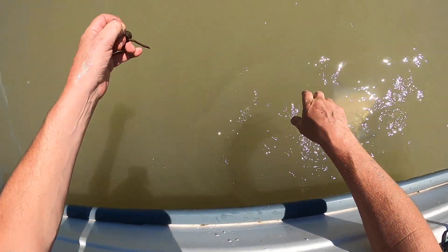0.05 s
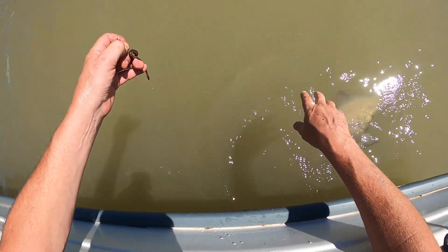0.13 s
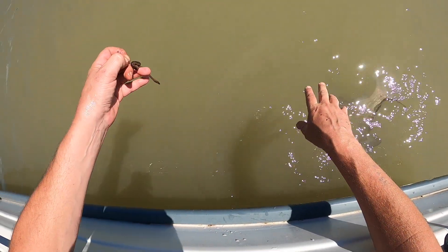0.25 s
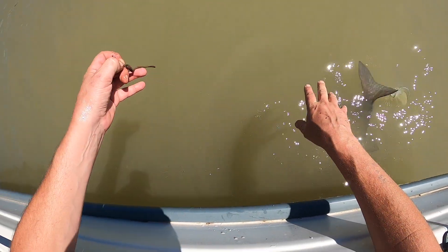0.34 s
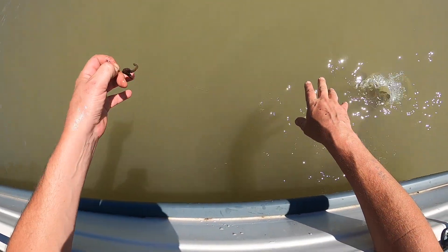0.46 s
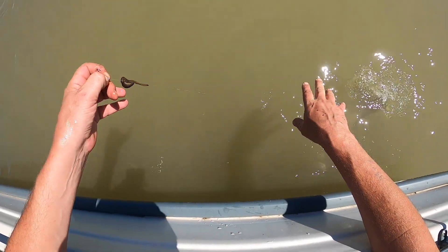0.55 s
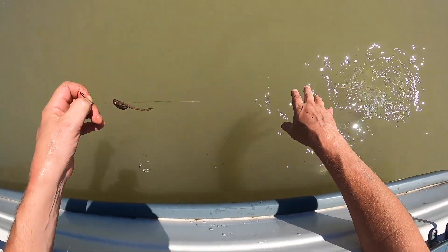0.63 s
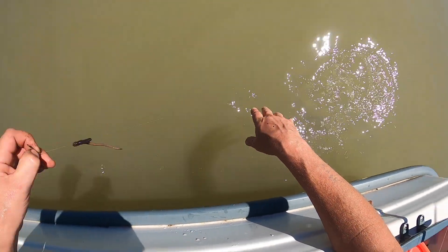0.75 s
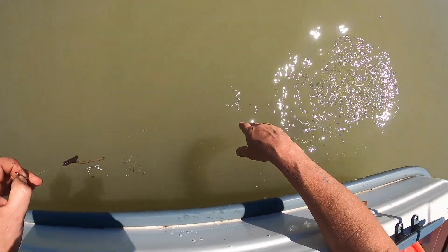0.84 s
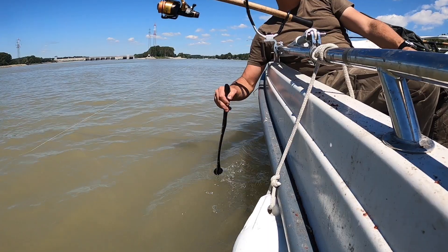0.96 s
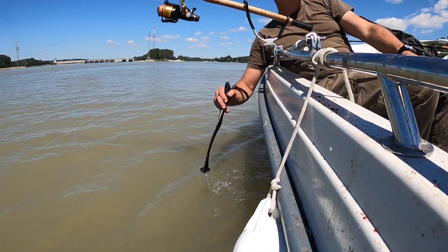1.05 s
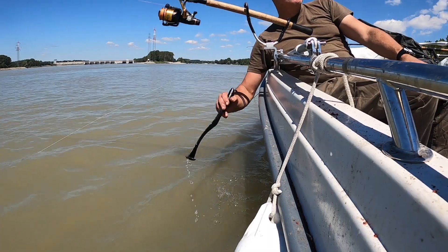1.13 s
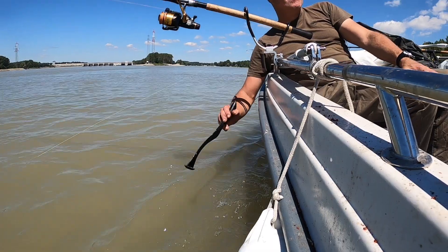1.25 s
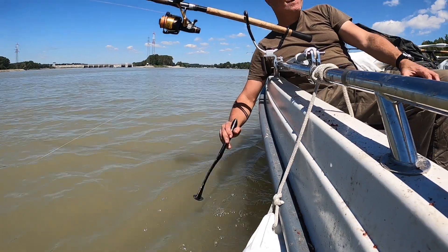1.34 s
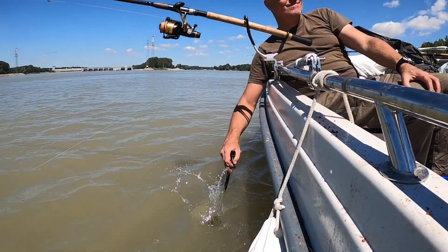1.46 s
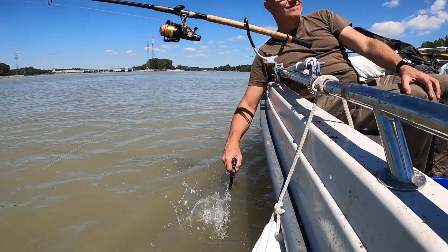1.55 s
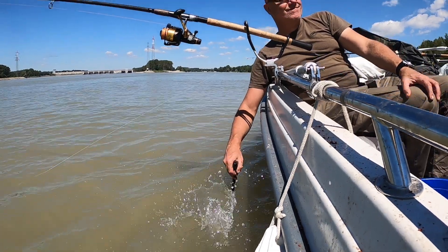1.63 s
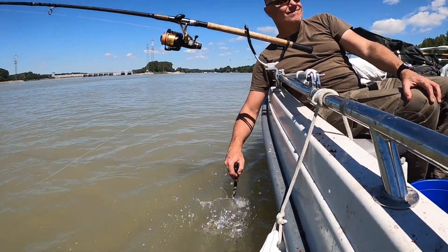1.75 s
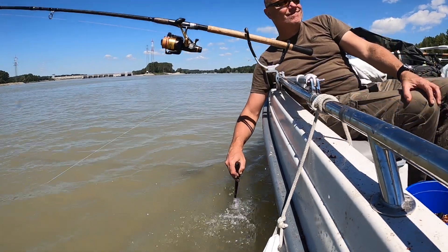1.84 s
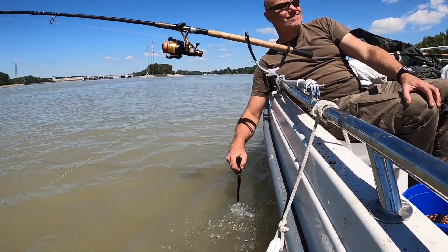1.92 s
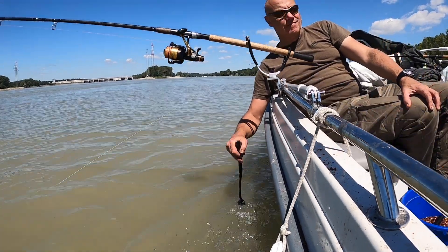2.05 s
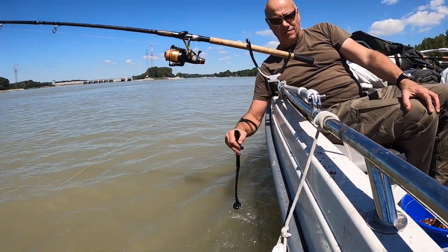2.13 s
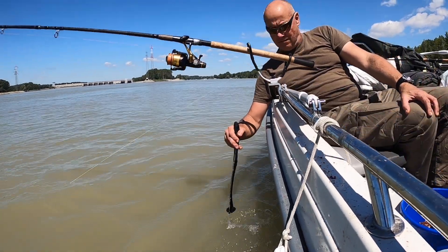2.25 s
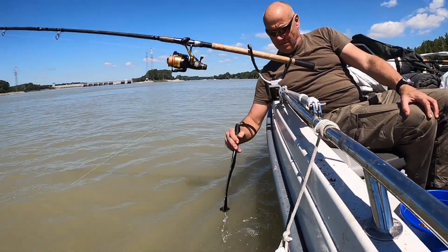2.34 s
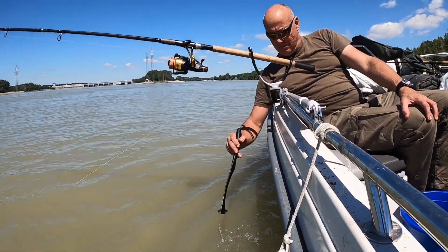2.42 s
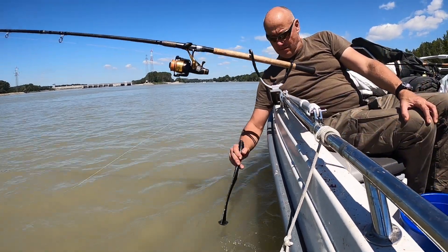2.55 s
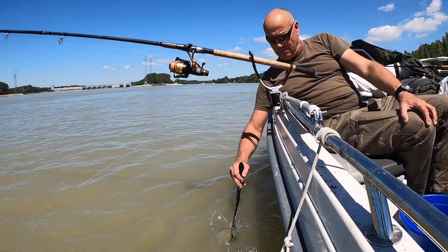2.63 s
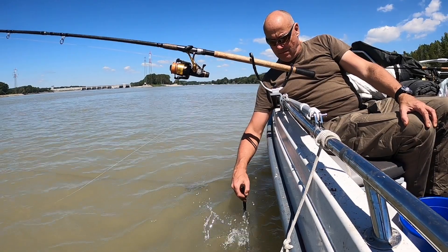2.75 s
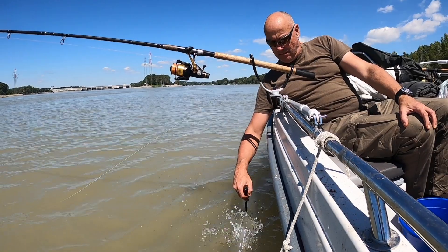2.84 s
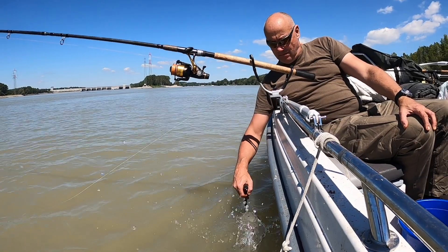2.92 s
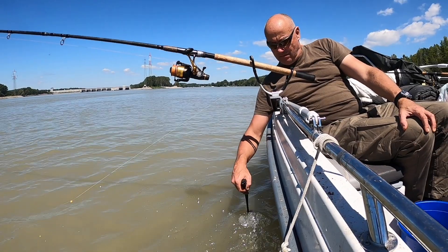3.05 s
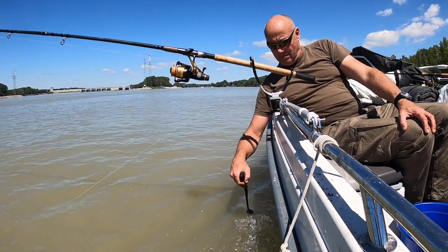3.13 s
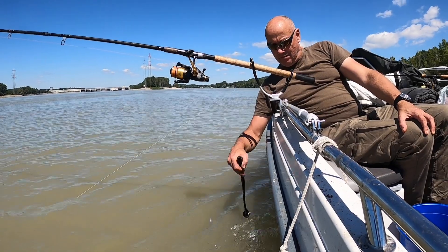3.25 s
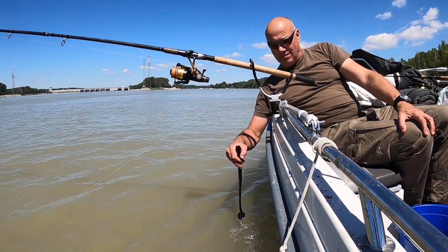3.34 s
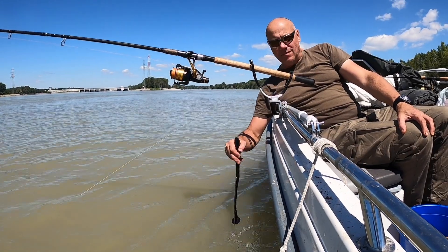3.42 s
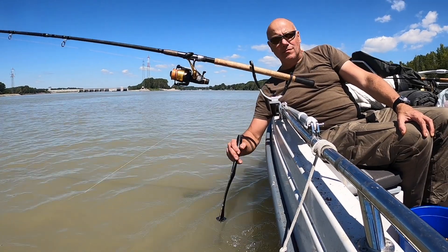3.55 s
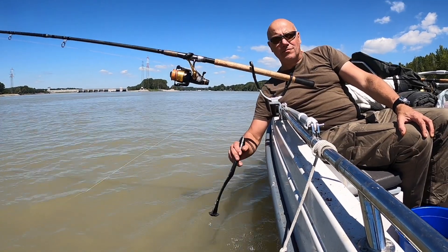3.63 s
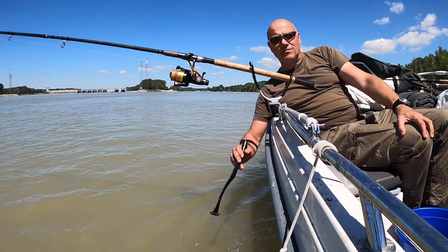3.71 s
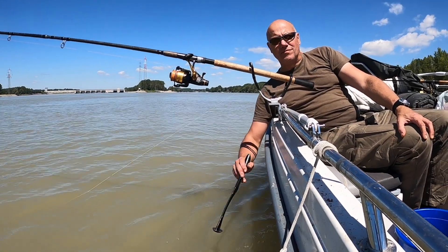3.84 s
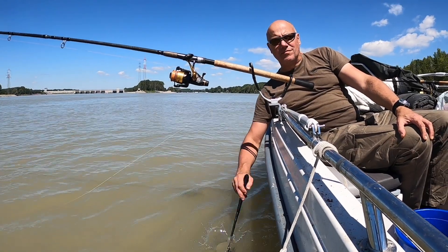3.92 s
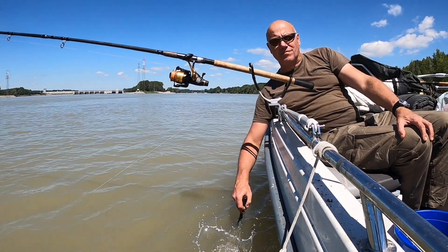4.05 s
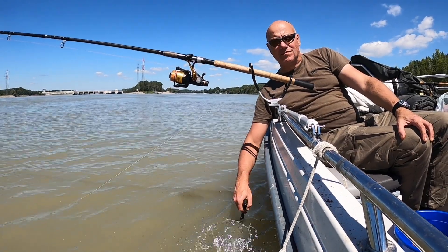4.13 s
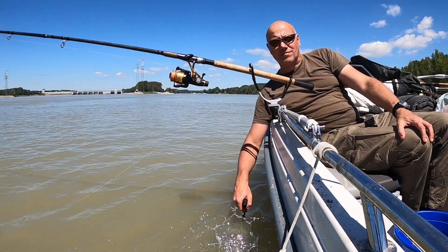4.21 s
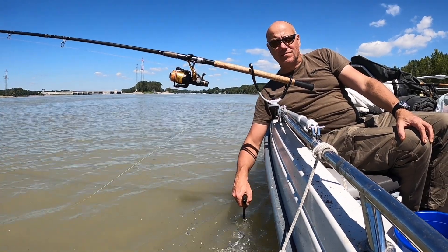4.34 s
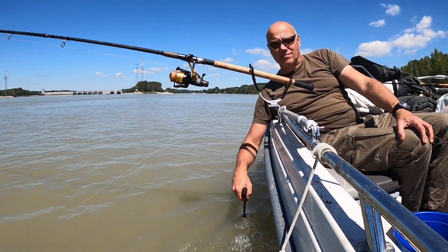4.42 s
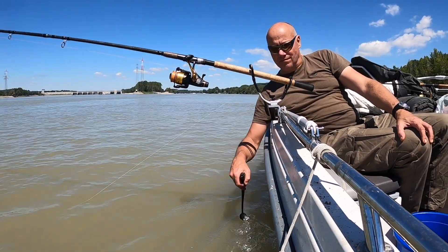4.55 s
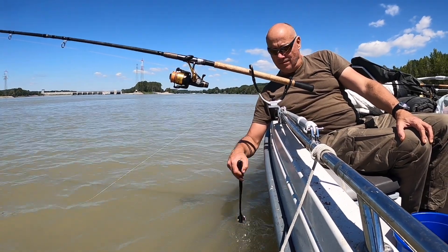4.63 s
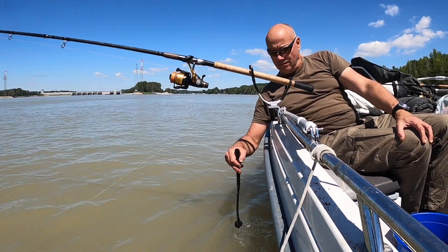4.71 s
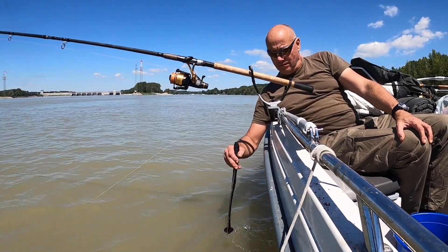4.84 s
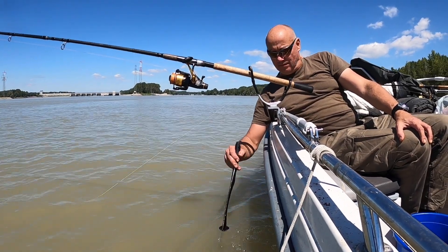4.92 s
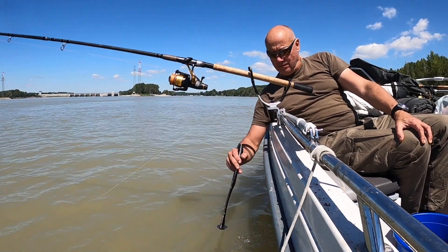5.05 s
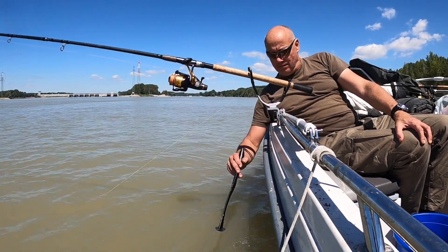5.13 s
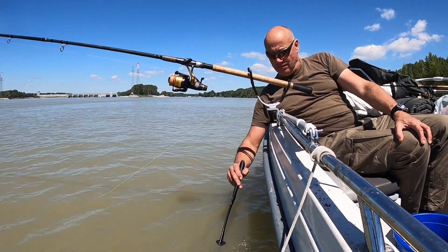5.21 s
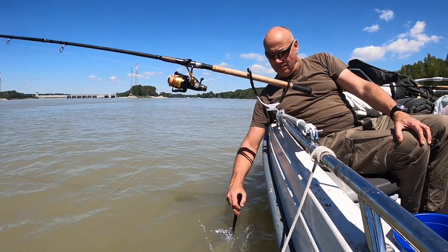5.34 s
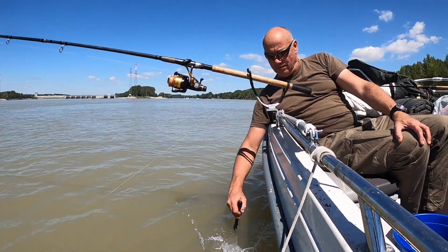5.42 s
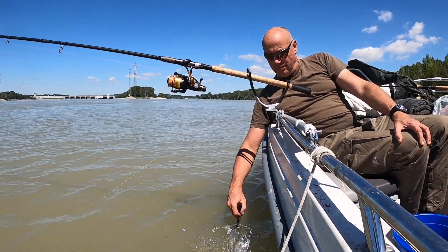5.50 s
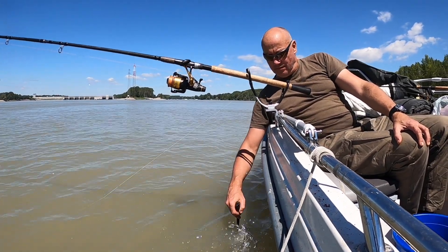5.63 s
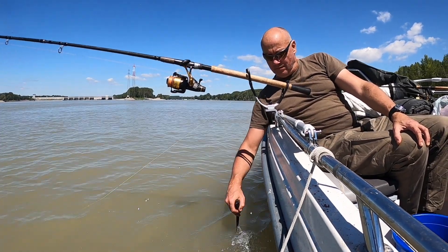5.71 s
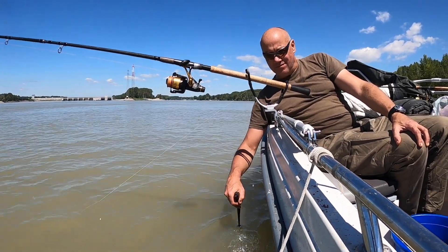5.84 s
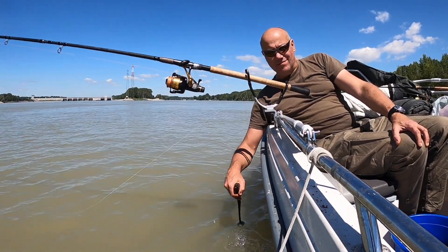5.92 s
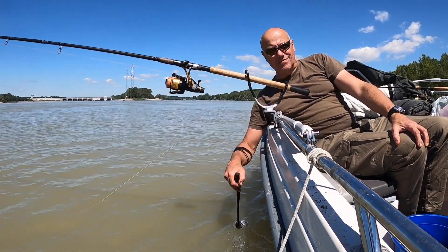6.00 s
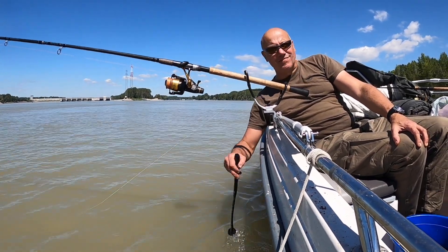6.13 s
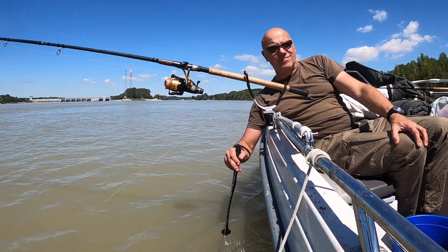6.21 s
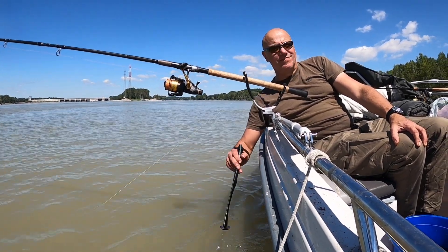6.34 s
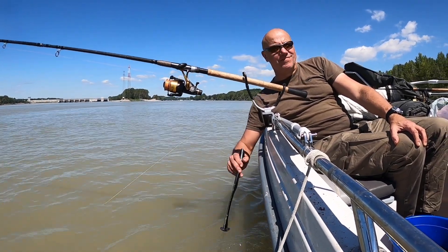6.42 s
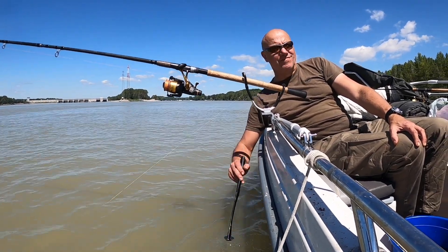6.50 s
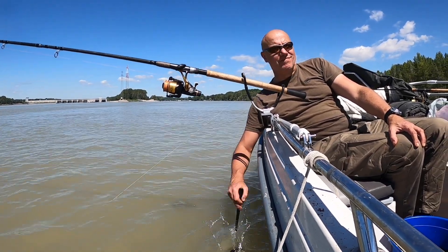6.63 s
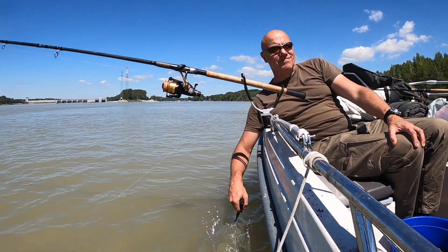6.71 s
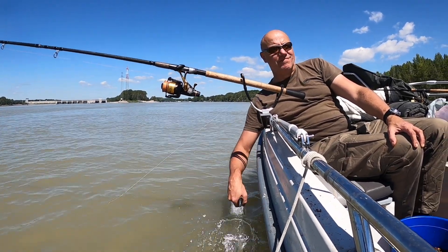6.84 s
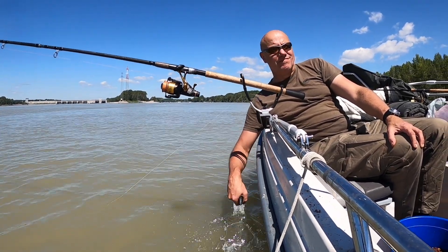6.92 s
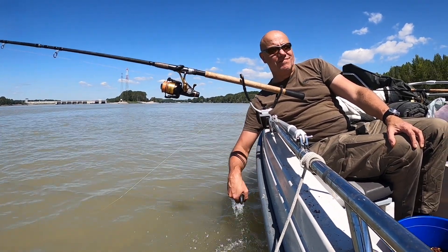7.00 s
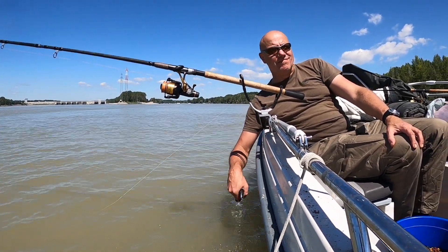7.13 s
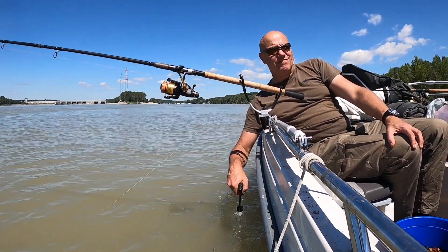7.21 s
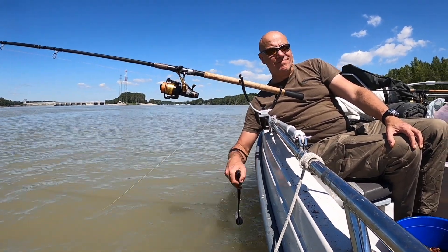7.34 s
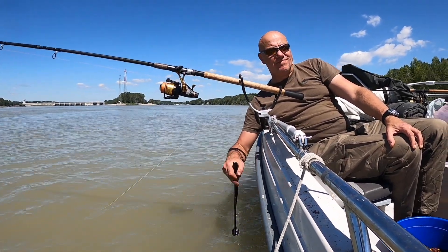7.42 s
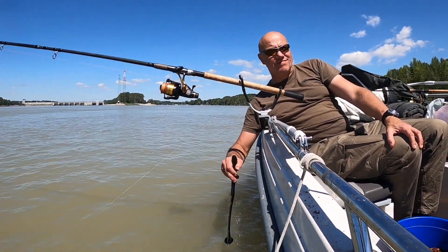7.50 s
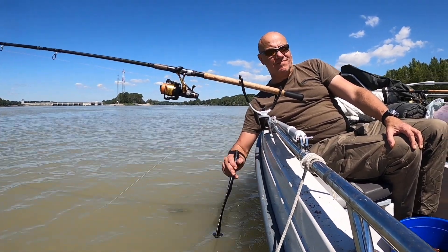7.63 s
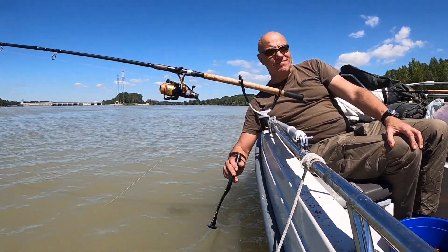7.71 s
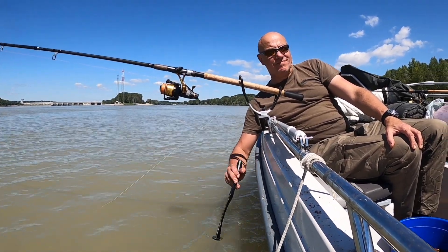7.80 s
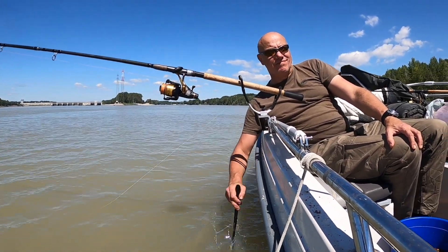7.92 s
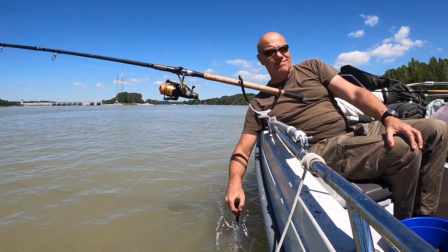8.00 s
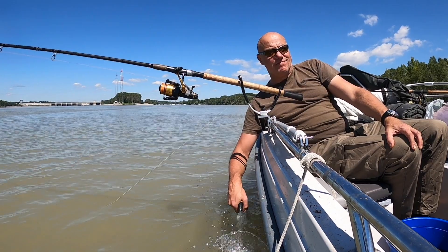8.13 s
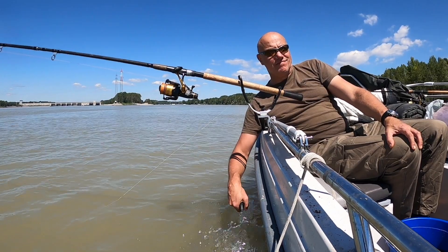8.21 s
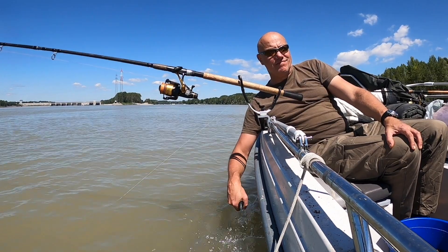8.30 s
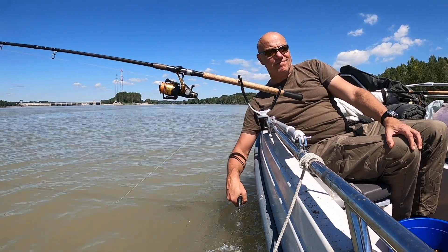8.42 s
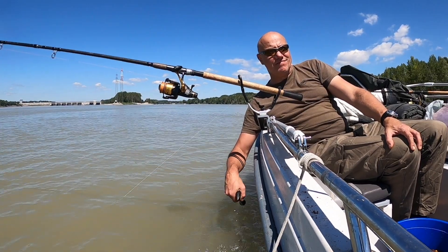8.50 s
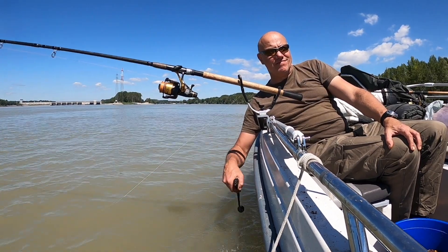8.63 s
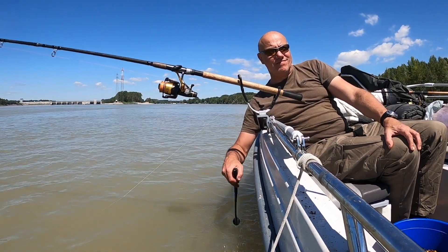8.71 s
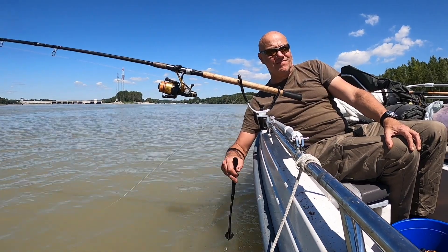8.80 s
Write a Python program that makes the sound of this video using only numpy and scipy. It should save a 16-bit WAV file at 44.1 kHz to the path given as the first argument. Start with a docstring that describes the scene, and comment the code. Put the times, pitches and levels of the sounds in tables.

```python
"""A fish splashes beside a small boat under a faint tonal hiss; then a clonk is pulled through the river six times.
The cup drags down an air pocket whose note falls as it lengthens; it pinches off with a crack of ringing
bubbles, then booms as one big bubble that rises in pitch as it floats up. Bubble crowds gurgle and fizz,
drops and thumps ring singly, low noise washes at the hull, and gusts rumble at the microphone.
"""
import sys
import numpy as np
from scipy import signal
from scipy.fft import rfft, irfft, next_fast_len
from scipy.io import wavfile

SR = 44100
rng = np.random.default_rng(int(sys.argv[2]) if len(sys.argv) > 2 else 0)


def unload_audio(sound):
    """Save the sound as a 16-bit wav file, at the path given as the first command line argument."""
    columns = np.transpose(np.atleast_2d(sound))
    # keep every value between -1 and 1, then stretch to whole-number steps
    steps = np.round(np.clip(columns, -1, 1) * 32767)
    wavfile.write(sys.argv[1], SR, steps.astype(np.int16))


N = 390726
TIME = np.arange(N) / SR
CUTOFF_HZ = 16000
RIVER_FROM_S = 1.0
SIDES = np.array([[1], [-1]])  # left, right

# strokes: [pinch-off t/s, ringing crack level/dB, hissing crack level/dB, churn level/dB, churn t60/s]
STROKE_ROWS = [(1.5833, -5, -20.5, -23, 0.27), (2.821, -22.5, -17, -26, 0.24),
               (4.114, -13, -18.5, -23.5, 0.23), (5.4695, -11.5, -18.5, -23.5, 0.27),
               (6.797, -20, -15, -19, 0.21), (8.121, -4, -18.5, -18.5, 0.24)]
# open air pocket, row per stroke: [opening t/s, first f/Hz, last f/Hz, sinking time/s,
# gulp level/dB, swell level/dB, swell delay/s]
POCKET_ROWS = [(1.49, 847, 363.3, 0.021, -33, -13, 0.053), (2.729, 743, 350, 0.031, -39.5, -49, 0.036),
               (4.029, 727, 371, 0.024, -24, -30.5, 0.045), (5.383, 634, 353, 0.034, -42, -33, 0.03),
               (6.699, 688, 338, 0.022, -21.5, -34.5, 0.035), (8.016, 681, 291.4, 0.046, -21, -26, 0.092)]
# spectrum of air noise, ripples and click: [f/Hz, relative level/dB]
AIR_SPECTRUM = [(350, -22.5), (600, 6), (688, -17.5), (984, -2.5), (1100, -6), (1260, -4.5), (2340, -9),
                (4910, -15.5), (5560, -16), (14100, -32.5), (16000, -50)]


def amp(db):
    """Decibels to gain."""
    return 10 ** (np.asarray(db) / 20)


def unit(x):
    """Scales to rms 1."""
    return x / np.sqrt(np.mean(x ** 2) + 1e-20)


def fade(t, t60):
    """Exponential decay, 60 dB down at t60."""
    return np.exp(-np.log(1000) * t / max(t60, 1e-3))


def bell(t, rise_s, fall_s):
    """Gaussian swell that peaks at t = 0; 1/e at rise_s before and fall_s after."""
    return np.exp(-np.minimum((t / np.where(t < 0, rise_s, fall_s)) ** 2, 60))


def add(mix, s, sound):
    """Mixes a sound in at time s."""
    part = mix[max(round(s * SR), 0):][:len(sound)]
    part += sound[:len(part)]


def colour(x, tone):
    """Gives x a spectrum, interpolated over log frequency, at rms 1."""
    size = next_fast_len(len(x))
    hz, db = np.transpose(tone)
    log_hz = np.log(np.fft.rfftfreq(size, 1 / SR) + 1)
    gain = amp(np.interp(log_hz, np.log(hz + 1), db))
    return unit(irfft(rfft(x, size) * gain, size)[:len(x)])


def noise(tone, size=N):
    """Steady coloured noise, rms 1."""
    return colour(rng.standard_normal(size), tone)


def murmur(width_hz, size):
    """Slowly wandering complex amplitude, rms 1: it blurs a tone into a band."""
    low_pass = signal.butter(2, min(width_hz / 2, SR / 4), fs=SR, output="sos")
    z = signal.sosfilt(low_pass, rng.standard_normal((2, size + SR // 10)))
    return (unit(z[0]) + 1j * unit(z[1]))[-size:] / np.sqrt(2)


def lumps(depth_db, rate_hz):
    """Random unevenness of level, rms 1."""
    return unit(amp(depth_db * np.clip(unit(murmur(rate_hz, N).real), -2, 2)))


def swells(rows):
    """Gain of a series of smooth swells, given as (s, half length s, dB)."""
    return sum(amp(db) * bell(TIME - s, half_s, half_s) for s, half_s, db in rows)


def open_river():
    """Gain of the river's background: off, then steady."""
    return np.clip((TIME - RIVER_FROM_S) / .004 + 1, 0, 1)


def image_width():
    """Stereo width: centred at first, fully open from 4.6 s."""
    return np.interp(TIME, [3.9, 4.6], [0, 1])


def ring(hz, t60, rise=0, swell=0.9):
    """A bubble: a sine that swells within a cycle or two, dies away and drifts by a share rise per second."""
    t = np.arange(int(SR * np.clip(1.3 * t60, .004, .4))) / SR
    tone = np.sin(2 * np.pi * hz * (t + rise * t * t / 2))
    return (1 - np.exp(-t * hz * swell)) * fade(t, t60) * tone


def swarm(per_s, low_hz, high_hz, cycles, spread_db, rise, count=48):
    """Steady random crowd of bubbles of many sizes; small ones ring higher and die sooner."""
    out = np.zeros(N)
    pitches = np.geomspace(low_hz, min(high_hz, SR / 2), count)
    lives = rng.uniform(0.75, 1.57, count)
    shapes = [hz * ring(hz, cycles * k / hz, rise * k) for hz, k in zip(pitches, lives)]
    draws = np.random.default_rng(rng.integers(2 ** 31)).random((int(per_s * N / SR), 3))
    sizes = amp(spread_db * np.minimum(-np.log(1 - draws[:, 2]), 3.5))
    for (when, which, _), size in zip(draws, sizes):
        add(out, when * N / SR, size * shapes[int(which * count)])
    return out


def pockets(gulp_s=0.0075, swell_s=0.026, shut_s=0.0071, blur=.35, overtone=.17, blur_hz=200):
    """The open pocket sings lower as it lengthens; its ragged walls blur the note and stir its overtones."""
    out = np.zeros(N)
    for (pinch_s, *_), row in zip(STROKE_ROWS, POCKET_ROWS):
        s, first_hz, last_hz, sink_s, gulp_db, swell_db, delay_s = row
        t = np.arange(0, pinch_s - s, 1 / SR)
        hz = last_hz + (first_hz - last_hz) * np.exp(-t / sink_s)
        turn = np.exp(2j * np.pi * np.cumsum(hz) / SR)
        note = turn * (1 + blur * murmur(blur_hz, len(t)))
        note = note + sum(overtone * turn ** k * murmur(blur_hz, len(t)) for k in (2, 3))
        gulp = amp(gulp_db) * (t / gulp_s * np.exp(1 - t / gulp_s)) ** 2
        swell = amp(swell_db) * bell(t - delay_s, swell_s, swell_s) * np.minimum(t / gulp_s, 1)
        shutting = np.minimum((t[-1] - t) / shut_s, 1)
        add(out, s, note.imag * (gulp + swell) * shutting)
    return out


def booms(squeeze=1.0, relax_s=0.0048, overtone_db=-30, creep=0.242, burst_share=0.2,
          wobble_per_s=1.8, waver_hz=45):
    """The closed bubble starts squeezed and high, drops to its deep note, then climbs and swells near the surface."""
    # closed bubble, row per stroke: [deep f/Hz, surface f/Hz, float-up time/s, lateness of climb (power),
    # level/dB, t60/s, surfacing level/dB]
    boom_rows = [(130, 225, .11, 2.43, -7, 0.12, -41), (104.8, 384, .335, 3.4, -11.5, 0.28, -32),
                 (109, 590, .416, 3.3, -9.5, 0.29, -41), (116.5, 450, .305, 2.96, -7.5, 0.25, -39),
                 (86, 465, 0.133, 4.8, -10.5, 0.22, -15.5), (103.6, 520, .159, 2.84, -10, 0.26, -33)]
    out = np.zeros(N)
    for (pinch_s, *_), row in zip(STROKE_ROWS, boom_rows):
        deep_hz, top_hz, float_s, lateness, db, t60, surface_db = row
        t = np.arange(0, float_s, 1 / SR)
        risen = t / float_s
        climb = creep * risen + (1 - creep) * risen ** lateness
        hz = deep_hz * (top_hz / deep_hz) ** climb * (1 + squeeze * np.exp(-t / relax_s))
        phase = 2 * np.pi * np.cumsum(hz) / SR
        unsteady = abs(1 + wobble_per_s * float_s * murmur(waver_hz, len(t)))  # a slow climb wobbles more
        swing = amp(db) * fade(t, t60) + amp(surface_db) * risen ** 2 * unsteady
        bursting = np.minimum((1 - risen) / burst_share, 1)
        onset = 1 - np.exp(-t / .0025)
        tone = amp(overtone_db) * np.cos(2 * phase) - np.sin(phase)
        add(out, pinch_s + .0021, swing * bursting * onset * tone)
    return out


def cracks(ring_life=2.34, hiss_t60=0.058, swell_s=0.0018, neck_db=-15, neck_s=0.0036,
           thud_db=-6, thud_hz=265, thud_t60=0.052):
    """The pocket's neck hisses shut, then its walls slam together: thud, burst and cluster of ringing bubbles."""
    # small bubbles shed at pinch-off, list per stroke: [f/Hz, width/Hz, level/dB]
    shed_modes = [
        [(836, 200, 3.5), (1260, 100, -7), (1560, 190, 0.5), (2380, 440, 7.5), (4780, 150, -16),
         (6100, 170, -16)],
        [(1520, 230, 11), (2890, 94, 7.5), (3300, 90, 3), (4400, 120, 3), (5480, 160, 7), (6440, 100, -21)],
        [(975, 100, 3), (1485, 255, 14), (1990, 170, 5), (2670, 190, 4), (4470, 200, 2.5), (6470, 120, -21)],
        [(1044, 150, 4), (1640, 150, -1), (2450, 280, 7), (3070, 130, -14), (4460, 170, -4), (5820, 250, 0.5)],
        [(1035, 46, 0), (1446, 23, 0), (4280, 42, -12), (4250, 21, -9), (4540, 15, -24), (5100, 120, -8)],
        [(1030, 85, -18), (1620, 350, 13.5), (2470, 110, -16), (3190, 120, -8), (3630, 160, -6.5),
         (5150, 120, -16)],
    ]
    # hiss spectrum: [f/Hz, relative level/dB]
    hiss_tone = [(150, -67), (250, 7.5), (510, -17), (1010, -39), (1240, -6), (1700, -17), (1980, -15),
                 (2910, -10.5), (7310, -21.5), (7980, -18.5), (14900, -44.5), (16000, -57)]
    out, t = np.zeros(N), np.arange(4096) / SR
    swell = 1 - np.exp(-(t / swell_s) ** 2)
    for (s, crack_db, hiss_db, *_), modes in zip(STROKE_ROWS, shed_modes):
        cluster = sum(amp(db) * fade(t, ring_life / width_hz) * np.sin(2 * np.pi * (hz * t + rng.random()))
                      for hz, width_hz, db in modes)
        hiss = noise(hiss_tone, len(t))
        add(out, s - t[-1], amp(hiss_db + neck_db) * hiss * np.exp(-t[::-1] / neck_s))
        add(out, s, swell * (amp(crack_db) * cluster + amp(hiss_db) * hiss * fade(t, hiss_t60)))
        add(out, s + 0.0012, -amp(crack_db + thud_db) * ring(thud_hz, thud_t60))
    return out


def rushes(attack_s=0.0012, tear_s=0.014, narrow_s=0.084, lead_s=0.0073, fizz_t60=0.35):
    """Gains of gurgle and fizz along the shaft: a burst as the pocket opens, another as it narrows."""
    # water tearing along the shaft, row per stroke: [opening gurgle level/dB, narrowing gurgle level/dB, fizz level/dB]
    rush_rows = [(-29, -49, -48), (-60, -48.5, -53), (-31, -57, -51), (-35, -51, -46.5), (-45, -51, -47.5),
                 (-34, -32.5, -43)]
    gurgle, fizz = np.zeros(N), np.zeros(N)
    for (pinch_s, *_), (s, *_), (open_db, narrow_db, fizz_db) in zip(STROKE_ROWS, POCKET_ROWS, rush_rows):
        t = np.arange(0, pinch_s - s, 1 / SR)
        onset = 1 - np.exp(-t / attack_s)
        narrowing = bell(t - t[-1] + lead_s, narrow_s, narrow_s)
        add(gurgle, s, onset * (amp(open_db) * np.exp(-t / tear_s) + amp(narrow_db) * narrowing))
        add(fizz, s, onset * amp(fizz_db) * fade(t, fizz_t60))
    return gurgle, fizz


def showers(lump_db=4.0, lump_hz=70, trickle_db=-50, trickle_fizz_db=-62, trickle_delay_s=0.13, trickle_s=0.079):
    """Gains of gurgle and fizz where thrown water lands: each shower builds and thins, arriving in clumps."""
    # showers from fish and strokes: [thickest t/s, build-up/s, dying away/s, gurgle level/dB, fizz level/dB]
    spray_rows = [(.087, 0.01, 0.022, -40, -71), (0.428, 0.031, 0.075, -41, -62),
                  (.545, 0.034, 0.028, -43, -44), (.605, 0.018, 0.048, -44.5, -50.5),
                  (.76, 0.074, 0.027, -61, -61.5), (1.06, 0.045, 0.095, -60, -68),
                  (1.89, 0.066, .13, -45, -50), (3.12, 0.061, 0.17, -44, -56.5),
                  (4.47, 0.074, 0.075, -40, -53.5), (5.78, 0.078, 0.1, -49, -55.5),
                  (7.12, 0.23, 0.19, -41.5, -51.5), (8.458, 0.11, 0.085, -35.5, -46.5)]
    gains = sum(amp([[gurgle_db], [fizz_db]]) * bell(TIME - s, rise_s, fall_s)
                for s, rise_s, fall_s, gurgle_db, fizz_db in spray_rows)
    # the crater's rim drains back
    trickle = sum(bell(TIME - s - trickle_delay_s, trickle_s, trickle_s) for s, *_ in STROKE_ROWS)
    gains = gains + amp([[trickle_db], [trickle_fizz_db]]) * trickle
    return gains * lumps(lump_db, lump_hz)


def splashes(rush_fizz_db=3, spray_db=-1, spray_fizz_db=-2, churn_db=-1.5, churn_fizz_db=-10,
             fizz_life=0.59, linger_db=-16, linger_s=0.06, froth_db=-7):
    """Crowds of bubbles gurgle and tiny drops fizz: along the shaft, after pinch-off and where spray lands."""
    # spectra of spray gurgle, churn, fizz and froth: [f/Hz, relative level/dB]
    gurgle_tone = [(200, -36), (400, 6.5), (700, -2.5), (1100, 3), (1600, 0.5), (2400, -3), (3300, -4.5),
                   (4500, -20), (8000, -13)]
    churn_tone = [(200, 13), (450, 5), (700, 3.5), (1000, 4), (1500, 3.5), (2200, -6), (3200, -9.5),
                  (4500, -29.5), (8000, -43)]
    fizz_tone = [(1500, 5), (3200, 0), (4500, 2.5), (6000, -4.5), (8000, -4.5), (10000, -14), (12500, -24),
                 (16000, -34)]
    froth_tone = [(150, -25), (400, -3.5), (700, -7.5), (1400, 0.5), (2800, -5), (5000, -17.5),
                  (10000, -28), (16000, -55)]
    gurgle = colour(swarm(per_s=1000, low_hz=330, high_hz=5500, cycles=30, spread_db=3, rise=7), gurgle_tone)
    boil = colour(swarm(per_s=900, low_hz=380, high_hz=5000, cycles=28, spread_db=3.5, rise=9), churn_tone)
    fizz = colour(swarm(per_s=2400, low_hz=2810, high_hz=16200, cycles=8.1, spread_db=-2, rise=0), fizz_tone)
    churn, foam, t = np.zeros(N), np.zeros(N), np.arange(SR // 2) / SR
    for s, _, _, db, t60 in STROKE_ROWS:
        swell = amp(db) * (1 - np.exp(-t / 0.00082))
        # the crater closes over and traps more air
        closing = amp(linger_db) * np.exp(-(2 * (t / linger_s - 1)) ** 2)
        add(churn, s, swell * (fade(t, t60) + closing))
        add(foam, s, swell * fade(t, t60 * fizz_life))
    rush, rush_fizz = rushes()
    spray, spray_fizz = showers()
    boil *= rush + amp(churn_db) * churn
    fizz *= amp(rush_fizz_db) * rush_fizz + amp(spray_fizz_db) * spray_fizz + amp(churn_fizz_db) * foam
    froth = amp(froth_db) * noise(froth_tone)  # bubbles too many to tell apart
    return amp(spray_db) * spray * (gurgle + froth) + boil + fizz


def stray_drops(first_s=.08, last_s=.48, thinning_db=-8, bubble_db=-35, slap_db=-44, spread_db=4,
                low_hz=950, high_hz=2700, cycles=34, slap_hz=3200, count=10):
    """Small drops land at random after each stroke, late ones softer; returns rows of bubbles and of slaps."""
    bubbles, slaps = [], []
    for s, *_ in STROKE_ROWS:
        for late, size, pitch, glide in rng.random((count, 4)):
            hz = low_hz * (high_hz / low_hz) ** pitch
            db = bubble_db + thinning_db * late ** 2 + spread_db * (2 * size - 1)
            bubbles.append((s + first_s + late * (last_s - first_s), hz, db, cycles / hz, 16 * glide - 6))
        for late, size, pitch in rng.random((count, 3)):
            db = slap_db + thinning_db * late ** 2 + spread_db * (2 * size - 1)
            slaps.append((s + first_s + late * (last_s - first_s), db, slap_hz * 2 ** (pitch - .5)))
    return bubbles, slaps


def drips(drip_db=-57, spread_db=5, low_hz=1900, high_hz=6500, count=45):
    """Faint drips tick at random once the river is heard; returns rows of slaps."""
    return [(RIVER_FROM_S + when * (N / SR - RIVER_FROM_S),
             drip_db + spread_db * (2 * size - 1),
             low_hz * (high_hz / low_hz) ** pitch)
            for when, size, pitch in rng.random((count, 3))]


def plinks(bubble_db=-1, ring_db=7, slap_t60=0.0074, wet_db=-25):
    """Single bubbles start with a little spatter; thumps ring dully; a slap is a tick and a tiny trapped bubble."""
    # loudest single bubbles: [t/s, f/Hz, level before trim/dB, t60/s, pitch rise/(share per s)]
    bubble_rows = [(.4367, 1096, -25, 0.077, 0.5), (.4833, 1060, -22, .041, -7.5),
                   (.5029, 810, -22, 0.059, 9.5), (.5805, 554, -25, 0.12, 0.5),
                   (.564, 1650, -28.5, .025, 1), (.6064, 875, -15.5, 0.012, 1), (.768, 1400, -41, 0.04, -2),
                   (4.2869, 1580, -32.5, 0.049, 3), (4.3218, 1110, -24, 0.0062, 1),
                   (5.3865, 610, -29, 0.038, -6), (5.4299, 1520, -29, 0.02, 10),
                   (8.1804, 1370, -26, .026, 9), (.6393, 896, -29, 0.049, 1),
                   (1.026, 1000, -33.5, 0.038, -2), (1.6039, 2030, -18, 0.022, 1),
                   (1.6598, 1014, -14, 0.05, -5.5), (1.846, 378, -27, .06, 7),
                   (1.9814, 1030, -30.5, .039, -4), (3.0377, 1140, -31, .045, 0),
                   (3.0646, 1380, -29, .02, 6), (3.1415, 561, -30, 0.034, 3), (4.1397, 555, -29, .069, -2),
                   (4.5005, 1600, -30, 0.038, -15), (4.487, 2400, -24, 0.011, 3),
                   (4.4267, 1740, -29, .032, -2), (1.9784, 2410, -32, 0.026, 15),
                   (2.7987, 1415, -21, 0.012, -4), (6.893, 2370, -26.5, 0.04, 0),
                   (7.2389, 2590, -25, 0.012, 18), (8.1637, 3225, -27, .019, 2),
                   (5.505, 3300, -17, 0.01, 2), (7.1415, 1470, -28, .047, -1.5),
                   (1.8598, 1510, -20.5, 0.021, -13), (1.9766, 2010, -26.5, 0.018, 1),
                   (2.0676, 1673, -22.5, .022, -2), (2.2622, 709, -42.5, .096, 0.5),
                   (2.7012, 1420, -20, 0.0049, -11), (2.7346, 910, -23, 0.014, 14),
                   (2.773, 1480, -22.5, .016, 13), (2.8334, 1442, -24.5, 0.13, 2),
                   (2.8435, 1040, -8.5, 0.01, 2), (2.8623, 1456, -15.5, .035, -8),
                   (2.9796, 1630, -27, .032, 5), (3.0828, 1830, -24, .019, 19),
                   (3.1926, 1740, -21.5, 0.021, -2), (4.0732, 1474, -26.5, 0.033, 8),
                   (4.1718, 1013, -16.5, 0.055, -7.5), (4.187, 1020, -12, 0.036, 3),
                   (4.2134, 990, -14.5, 0.016, 5), (4.3921, 1076, -25.5, .033, -8),
                   (4.444, 1430, -22, 0.032, -5), (4.467, 2280, -19, 0.0087, 8),
                   (4.6018, 2310, -31.5, 0.018, -8), (4.6562, 536, -38, .059, 25),
                   (4.6793, 906, -38.5, 0.073, 24.5), (5.3831, 3480, -20, 0.011, -7),
                   (5.5023, 1630, -19, 0.045, -6.5), (5.51, 934, -12, 0.048, 0.5),
                   (5.554, 930, -16.5, 0.053, 9.5), (5.583, 1110, -24.5, 0.027, 0),
                   (5.6841, 910, -32.5, 0.042, 18), (5.7756, 1695, -25, 0.033, -15),
                   (5.8285, 1260, -26.5, 0.08, 15), (5.8927, 1552, -36, 0.097, -0.5),
                   (6.0883, 1516, -36, 0.058, -1), (6.748, 1380, -17, 0.016, -8),
                   (6.8188, 3160, -9.5, 0.01, 9), (6.824, 1423, -16, 0.052, 1.5),
                   (6.8405, 1630, -16, 0.016, 3), (6.8474, 506, -23.5, 0.097, -5.5),
                   (6.8959, 1360, -13, 0.013, 2), (7.1025, 428, -20, 0.046, 5),
                   (7.3818, 2200, -34, 0.016, -13), (7.988, 3130, -16, 0.016, -7),
                   (8.0145, 3080, -21, .02, 5), (8.0585, 930, -21, 0.077, -6),
                   (8.0642, 1390, -17.5, 0.027, 10), (8.0817, 1060, -20.5, 0.1, 2.5),
                   (8.2023, 1506, -15, 0.044, 14), (8.2784, 1080, -29, .056, -0.5),
                   (8.407, 445, -25, 0.046, -17), (8.4623, 1360, -16, 0.014, 0)]
    # dull thumps and gulps of water at the hull: [t/s, f/Hz, level/dB, t60/s]
    thump_rows = [(0.086, 273.4, -36, 0.52), (.31, 238, -44, 0.093), (0.379, 317, -24, 0.053),
                  (0.421, 165, -28, 0.082), (0.47, 338, -42, 0.057), (0.561, 101, -17.5, 0.17),
                  (0.573, 156, -2, 0.043), (0.582, 262, -23, 0.068), (.645, 76.5, -15, 0.076),
                  (0.824, 188, -15, 0.046), (0.85, 235, -22, 0.053), (6.185, 130, -30, 0.085)]
    # sharpest slaps on the surface, by drops and cup: [t/s, tick level/dB, f/Hz]
    slap_rows = [(.0807, -46, 4300), (.3806, -41, 2700), (.437, -49, 2870), (.5392, -30, 5200),
                 (.5822, -28.5, 5760), (.605, -35.5, 2780), (.419, -53, 2400), (.7407, -40.5, 5030),
                 (.769, -43, 2700), (1.095, -48, 7700), (1.122, -56, 6500), (1.3437, -45.5, 3960),
                 (3.4708, -48, 3130), (5.958, -52, 2970), (6.189, -44.5, 2140), (6.5589, -46, 5030),
                 (1.4658, -40.5, 3400), (1.629, -31, 5600), (1.8785, -33.5, 3330), (1.9272, -33.5, 2800),
                 (2.0049, -41, 5400), (2.0583, -31.5, 3080), (2.348, -41, 2630), (2.371, -45.5, 5860),
                 (2.5213, -47.5, 2820), (2.7024, -33, 3380), (2.7594, -37.5, 4220), (2.954, -49, 3030),
                 (3.006, -41.5, 3640), (3.1173, -34, 2600), (2.8429, -29, 2930), (2.9107, -37, 3000),
                 (3.0437, -34.5, 3300), (3.2636, -31.5, 3300), (3.3136, -39.5, 4670), (3.9997, -28, 3600),
                 (4.2238, -40, 4560), (4.428, -33, 3130), (4.4963, -33, 3730), (4.5656, -42, 2500),
                 (5.3535, -26, 8530), (6.7478, -42, 3500), (5.7492, -32.5, 3180), (5.7834, -36.5, 4250),
                 (5.837, -38, 2470), (6.5135, -44.5, 3100), (6.6655, -22.5, 3920), (7.0555, -32, 5000),
                 (7.118, -33.5, 4500), (7.2303, -35, 3880), (7.263, -32, 2570), (7.319, -33.5, 3720),
                 (7.9901, -17, 3440), (8.2092, -26.5, 2680), (8.4494, -34, 2720), (8.4832, -39, 2580),
                 (8.538, -34, 2900)]
    # spectrum of spatter and ticks: [f/Hz, relative level/dB]
    slap_tone = [(300, -11), (1000, -4.5), (3000, -3), (5000, -4.5), (8000, -7.5), (10000, -17),
                 (13000, -29.5), (16000, -39)]
    out, t = np.zeros(N), np.arange(1024) / SR
    small_bubbles, small_slaps = stray_drops()
    for s, hz, db, t60, rise in [*bubble_rows, *small_bubbles]:
        add(out, s, amp(db + bubble_db) * ring(hz, t60, rise))
        add(out, s, amp(db + wet_db) * noise(slap_tone, len(t)) * fade(t, .015))
    for s, hz, db, t60 in thump_rows:
        add(out, s, amp(db) * ring(hz, t60))
    for s, db, hz in [*slap_rows, *small_slaps, *drips()]:
        add(out, s, amp(db + ring_db) * ring(hz, slap_t60))
        tick = noise(slap_tone, len(t)) * fade(t, .011) * (1 - np.exp(-t / .0006))
        add(out, s, amp(db) * tick)
    return out


def hull(x, echo_db=-15, t60=0.12, order=2600):
    """The side of the boat and the water scatter a short dull echo: sparse random decaying taps."""
    t = np.arange(order) / SR
    taps = rng.standard_normal(order) * (rng.random(order) < .05) * fade(t, t60) * (t > .002)
    band = signal.sosfilt(signal.butter(1, [500, 7000], "band", fs=SR, output="sos"), x)
    return amp(echo_db) * signal.oaconvolve(band, taps / np.linalg.norm(taps))[:N]


def opening(start_db=-49.0, settled_db=-67, settle_s=0.33, release_s=0.13, bands_db=-5, chirp_db=-53,
            chirp_from_hz=4400, chirp_to_hz=2750, chirp_s=0.035, click_db=-31, click_t60=0.0036):
    """A faintly tonal hiss with two thin falling chirps; it fades and ends in a dry click."""
    # hiss spectrum: [f/Hz, relative level/dB]
    opening_tone = [(350, -23), (600, -3), (679, -19), (758, -2.5), (823, -5), (1610, -12.5), (1900, -16),
                    (2270, -13), (2800, -16), (4340, -13), (9890, -34), (13600, -54), (16000, -69)]
    # whistling bands: [f/Hz, width/Hz, relative level/dB]
    whistle_bands = [(1374, 100, 10), (1590, 47, -1), (2310, 89, 7), (3600, 49, -14), (4100, 66, -17),
                     (4600, 200, -9)]
    bands = unit(sum(amp(db) * (murmur(width_hz, N) * np.exp(2j * np.pi * hz * TIME)).real
                     for hz, width_hz, db in whistle_bands))
    level_db = settled_db + (start_db - settled_db) * np.exp(-TIME / settle_s)
    gain = amp(level_db) * np.clip((RIVER_FROM_S - TIME) / release_s, 0, 1)
    out = gain * (noise(opening_tone) + amp(bands_db) * bands)
    t = np.arange(0, .075, 1 / SR)
    hz = chirp_to_hz + (chirp_from_hz - chirp_to_hz) * np.exp(-t / chirp_s)
    chirp = np.sin(2 * np.pi * np.cumsum(hz) / SR) * signal.windows.tukey(len(t), .4) * fade(t, 0.34)
    for s, db in [(.285, 2), (.752, -4)]:
        add(out, s, amp(chirp_db + db) * chirp)
    add(out, RIVER_FROM_S, amp(click_db) * noise(AIR_SPECTRUM, len(t)) * fade(t, click_t60))
    return out


def wind(wind_db=-1, breeze_db=-52, wind_left_db=14, wind_side_db=-7):
    """Gusts rumble as low noise at both microphone ports, stronger on the left as time goes on."""
    # gusts at the microphone: [strongest t/s, half length/s, level before trim/dB]
    gust_rows = [(.43, 0.056, -33), (.59, 0.082, -25.5), (.85, 0.078, -33.5), (1.05, 0.033, -32.5),
                 (1.24, 0.13, -42), (2.25, 0.21, -49.5), (2.5, 0.049, -48), (3.27, .05, -49),
                 (4.3, 0.11, -56), (5.4, 0.072, -49), (4.98, 0.024, -46), (5.95, 0.035, -40),
                 (6.2, 0.057, -45), (6.64, 0.074, -42.5), (6.92, 0.089, -46), (7.27, .05, -30),
                 (7.44, 0.075, -32), (7.76, 0.14, -40.5), (8.14, 0.056, -33), (8.44, 0.17, -34.5),
                 (8.72, 0.095, -31.5)]
    # rumble spectrum: [f/Hz, relative level/dB]
    wind_tone = [(10, -7.5), (28, -5), (50, -3.5), (85, -9), (150, -17.5), (300, -40.5), (800, -77)]
    gust = amp(wind_db) * swells(gust_rows) + amp(breeze_db) * open_river()
    side = amp(wind_side_db) * gust * noise(wind_tone)
    ports = amp(SIDES * wind_left_db * np.interp(TIME, [3.6, 6.1], [0, 1]) / 2)
    return gust * noise(wind_tone) * ports / ports.mean(0) + SIDES * image_width() * side


def river(wash_db=-48.0, early_db=-51, early_t60=3.5, lapping_db=-3, ripple_db=-72):
    """Low wash on the hull, swirls around the fish, and faint ripples ticking in the background."""
    # water swirling at the hull around the fish: [strongest t/s, half length/s, level before trim/dB]
    swirl_rows = [(.12, 0.034, -36), (.19, .05, -44.5), (.41, 0.13, -34), (.58, 0.045, -35),
                  (.84, 0.052, -41), (1.09, 0.064, -66)]
    # wash spectrum: [f/Hz, relative level/dB]
    wash_tone = [(40, 3), (90, 3), (170, 1), (300, -3.5), (430, -7.5), (600, -22), (1000, -32), (3000, -76)]
    crowd = swarm(per_s=400, low_hz=1300, high_hz=11000, cycles=10, spread_db=4.5, rise=8)
    ripples = colour(crowd, AIR_SPECTRUM)
    wash = amp(wash_db) * open_river() + amp(early_db) * fade(TIME, early_t60)
    wash = wash + amp(lapping_db) * swells(swirl_rows)
    return wash * noise(wash_tone) + amp(ripple_db) * open_river() * ripples


def air_gain(air_db=-65.0, extra_db=5, settle_s=0.19):
    """Gain of the background air noise: it comes in a little louder, then settles."""
    return open_river() * amp(air_db + extra_db * np.exp(-abs(TIME - RIVER_FROM_S) / settle_s))


def lagged(x):
    """The sound as it reaches the left port, a little later than the right: a phase lag per frequency."""
    # lag of the left port: [f/Hz, phase/rad]
    port_lag = [(0, 0.21), (250, 0.28), (750, 0.34), (2500, 0.29), (4500, 0.62), (6500, 1), (8000, 0.86),
                (16000, 1)]
    size = next_fast_len(N)
    lag_rad = np.interp(np.fft.rfftfreq(size, 1 / SR), *np.transpose(port_lag))
    return irfft(rfft(x, size) * np.exp(-1j * lag_rad), size)[:N]


def scene(air_side_db=-9, left_db=0.9):
    """Centred at first; from about 4 s the image opens, the water a little louder and later on the left."""
    water = pockets() + booms() + cracks() + splashes() + plinks()
    air = air_gain()
    mid = water + hull(water) + river() + opening() + air * noise(AIR_SPECTRUM)
    width = image_width()
    side = hull(water) + amp(air_side_db) * air * noise(AIR_SPECTRUM)
    left = mid + width * (lagged(mid) - mid)
    ports = np.array([left, mid]) * amp(SIDES * width * left_db / 2)
    return ports + SIDES * width * side + wind()


def record(dry):
    """Band limit: linear-phase low-pass at CUTOFF_HZ."""
    low_pass = signal.firwin(511, CUTOFF_HZ, window=("kaiser", 9), fs=SR)
    return signal.oaconvolve(dry, low_pass[None], "same")


dry = scene()
out = record(dry)
unload_audio(out)
```